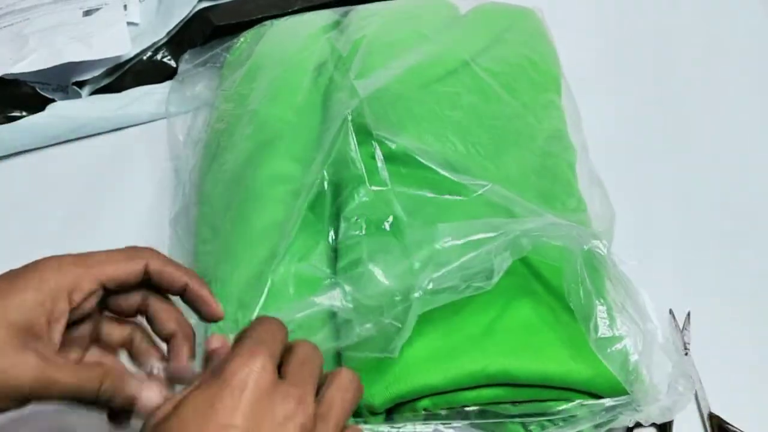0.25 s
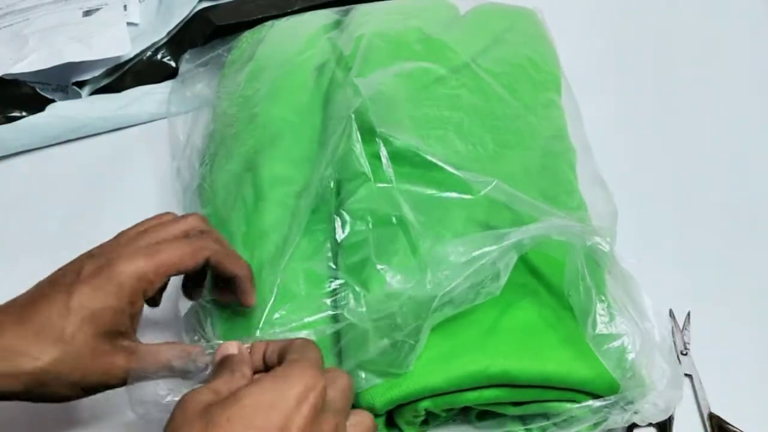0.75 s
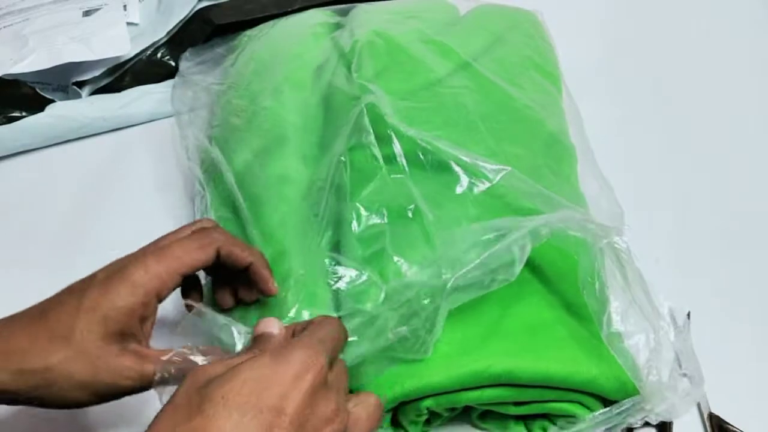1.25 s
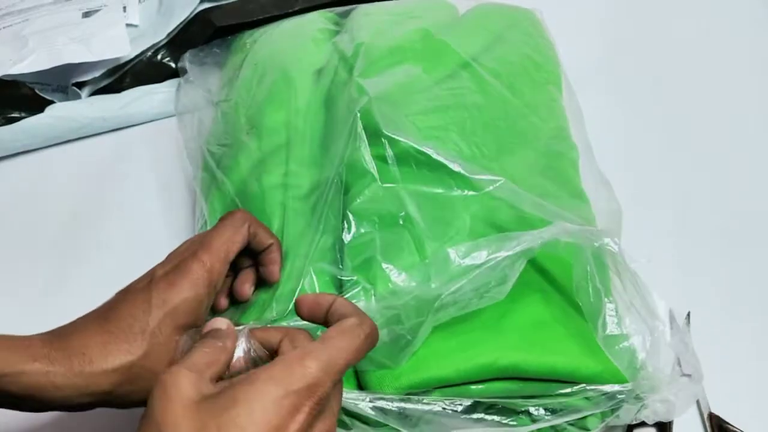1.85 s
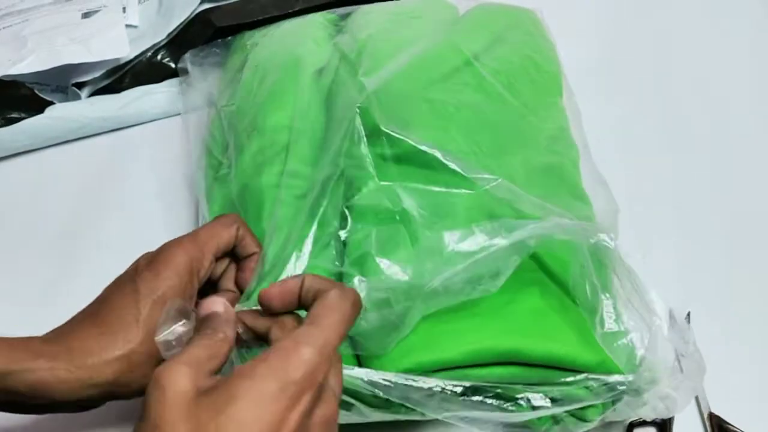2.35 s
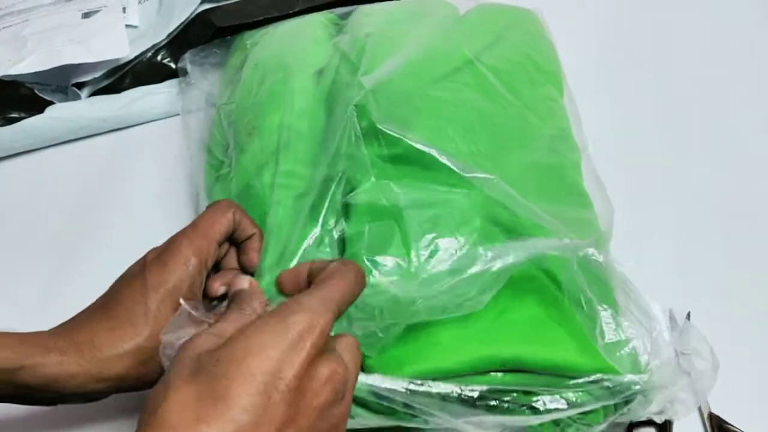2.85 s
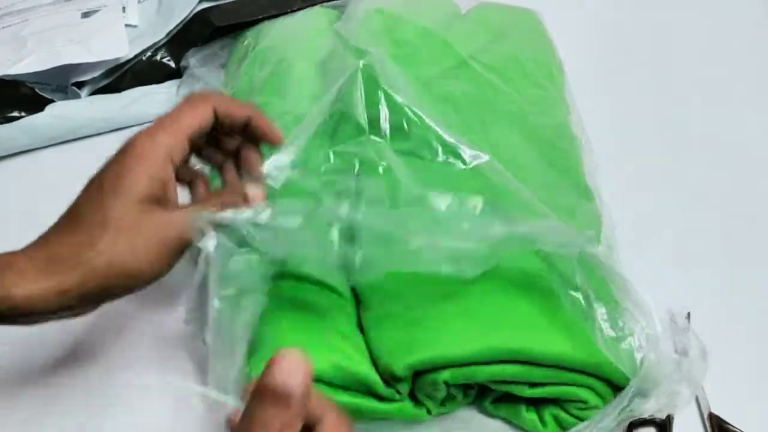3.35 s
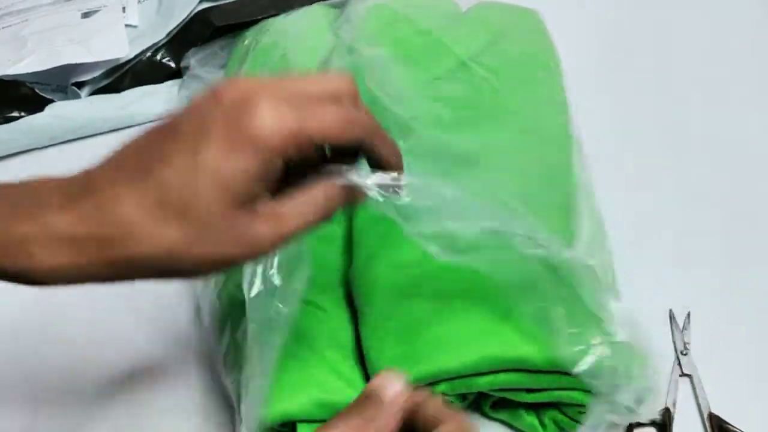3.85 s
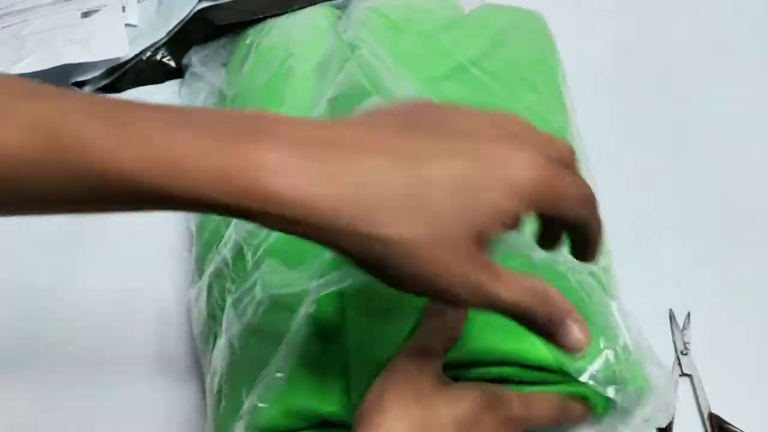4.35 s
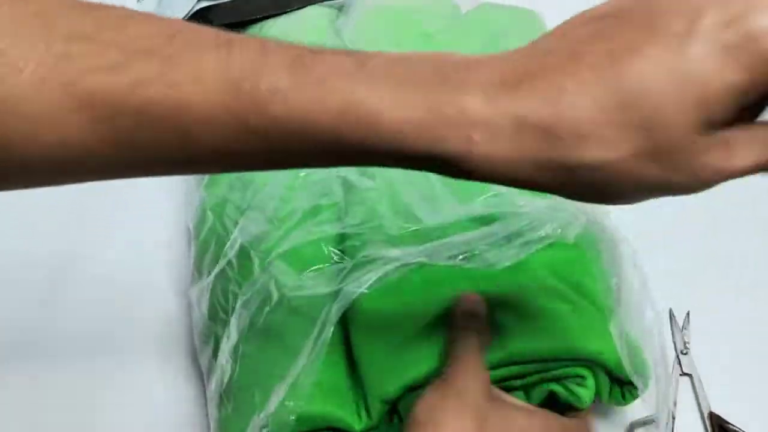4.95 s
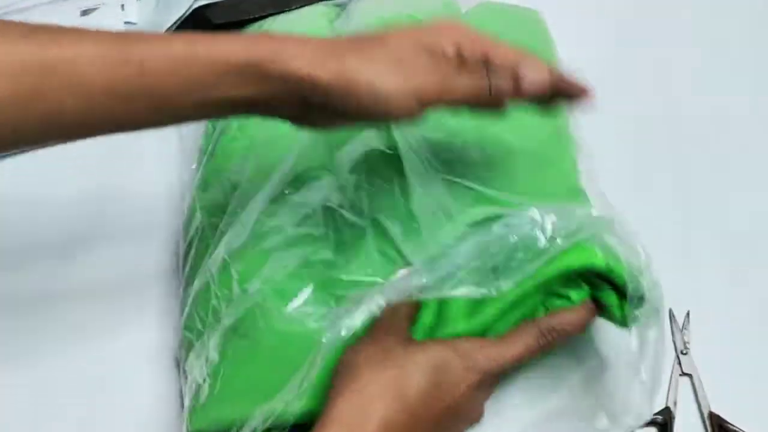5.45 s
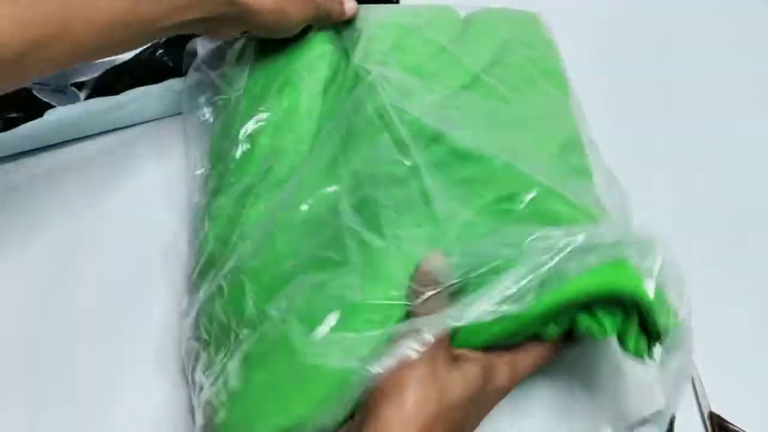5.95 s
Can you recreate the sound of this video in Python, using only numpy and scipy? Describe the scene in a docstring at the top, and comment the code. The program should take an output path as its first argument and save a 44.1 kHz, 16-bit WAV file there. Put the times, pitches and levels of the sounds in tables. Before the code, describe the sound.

A thin plastic bag crinkles, snaps and rips as hands tear it open, then rustles softly over folded cloth.

```python
"""Tearing open a polythene bag

Two hands tear a thin bag open on a table in a small room, then slide it over the folded cloth inside.
The film rustles as tiny creases buckle, and snaps and rips where pulled; the bundle bumps softly.
A close pair of microphone ports, bright near 6 and 15 kHz, hears it with reflections and a short tail."""
import sys
import numpy as np
from scipy import signal
from scipy.fft import rfft, irfft, next_fast_len
from scipy.io import wavfile

SR = 44100
rng = np.random.default_rng(int(sys.argv[2]) if len(sys.argv) > 2 else 0)


def wav_out(sig):
    """Save sig, one row per channel (or a flat mono array), as 16-bit PCM at SR to the path in sys.argv[1]."""
    wavfile.write(sys.argv[1], SR, np.round(np.clip(np.atleast_2d(sig).T, -1, 1) * 32767).astype(np.int16))


N = 272538
TIME = np.arange(N) / SR

# hands moving right to left: t/s, left port lag/samples
PORT_LAG = [(0, 6.5), (2.9, 6.5), (4.0, 4), (4.6, 0), (6.18, -4)]
# bright crack of the film: f/Hz, gain/dB
CRACK_SPECTRUM = [(1500, -31), (3000, -43), (4000, -18.5), (5500, -4.5), (6500, -2.5), (7500, -14),
                  (10500, -18.5), (13000, -17.5), (15400, -12), (16500, -31)]
# papery body of the film: f/Hz, gain/dB
BODY_SPECTRUM = [(40, -53), (120, -16), (220, 0.5), (400, -1), (850, 1.5), (1500, -0.5), (2200, 4),
                 (3100, 4.5), (4200, -6), (8000, -34.5)]


def from_db(db):
    return 10 ** (np.asarray(db) / 20)


def unit_rms(x):
    return x / np.sqrt(np.mean(x ** 2) + 1e-20)


def at_time(table, t_s):
    return np.interp(t_s, *np.transpose(table))


def at_hz(table, hz):
    f_hz, value = np.transpose(table)
    return np.interp(np.log(np.maximum(hz, 1)), np.log(f_hz), value)


def coloured(x, spectrum):
    """Minimum-phase filter, output at rms 1."""
    size = 2 * next_fast_len(x.shape[-1] // 2 + 2048)
    gain = from_db(at_hz(spectrum, np.fft.rfftfreq(size, 1 / SR)))
    cepstrum = irfft(np.log(gain))
    cepstrum[1:size // 2] *= 2
    cepstrum[size // 2 + 1:] = 0
    return unit_rms(irfft(rfft(x, size) * np.exp(rfft(cepstrum)))[..., :x.shape[-1]])


def resonance(x, hz, width_hz):
    r = np.exp(-np.pi * width_hz / SR)
    return signal.lfilter([1, 0, -1], [1, -2 * r * np.cos(2 * np.pi * hz / SR), r * r], x)


def drift(per_s):
    """Random wander, rms 1."""
    knots = rng.standard_normal(int(N / SR * per_s) + 2)
    return unit_rms(np.interp(TIME * per_s, np.arange(len(knots)), knots))


def swell(start_s, length_s):
    """Rounded envelope, 0 to 1 and back."""
    return np.sqrt(np.clip(1 - (2 * (TIME - start_s) / length_s - 1) ** 2, 0, 1))


def stereo_noise(spectrum, width):
    return coloured(rng.standard_normal(N) + width * rng.standard_normal((2, N)), spectrum)


def air(level_db=-70):
    """Quiet, dull room air."""
    # f/Hz, gain/dB
    spectrum = [(20, -20), (70, 16.5), (200, 10), (600, 10.5), (2000, -10), (6000, -18), (10000, -45)]
    return from_db(level_db) * stereo_noise(spectrum, width=0.5)


def room_decay(age_s, hz):
    """The room's ring dies sooner in the treble."""
    # f/Hz, T60/s
    reverb_times = [(150, .42), (1000, .33), (6000, .31), (15000, .26)]
    return np.exp(-np.log(1000) * age_s / at_hz(reverb_times, hz))


def room(x, tail_db=-4.2, build_ms=0.29):
    """Direct sound, reflections from nearby surfaces, standing waves and a diffuse tail."""
    # early reflections: delay/ms, level/dB
    echoes = [(2.7, -27), (4.6, -24), (9.0, -26)]
    # standing waves: f/Hz, level of the whole ring/dB
    modes = [(133, -22.5), (189, -31.5), (249, -29.5), (417, -29), (524, -30)]
    # tail, left to right: f/Hz, coherence/0-1
    coherence = [(130, .96), (300, .88), (640, .68), (1400, .25), (3000, .03)]
    size = SR // 2
    age_s, hz = np.arange(size) / SR, np.fft.rfftfreq(size, 1 / SR)
    mid, side = rfft(rng.standard_normal((2, size)))
    alike = at_hz(coherence, hz)
    diffuse = np.sqrt(1 + alike) * mid + np.sqrt(1 - alike) * side * [[1], [-1]]
    octave = np.round(np.log2(np.maximum(hz, 100)))
    tail = sum(irfft(diffuse * (octave == k), size) * room_decay(age_s, 2 ** k)
               for k in np.unique(octave))
    tail *= 1 - np.exp(-age_s * 1000 / build_ms)
    standing = sum(from_db(db) * unit_rms(np.cos(2 * np.pi * f_hz * age_s) * room_decay(age_s, f_hz))
                   for f_hz, db in modes)
    response = (from_db(tail_db) * unit_rms(tail) + standing) / np.sqrt(size)
    response[:, 0] += 1
    for delay_ms, db in echoes:
        at = int(delay_ms * SR / 1000) + rng.integers(0, 5, 2)
        response[[0, 1], at] += from_db(db)
    return signal.fftconvolve(x, response, axes=1)[:, :N]


def hand_work(attack_s=0.046, release_db_per_s=76.5, settle_db_per_s=84.5, let_go_db_per_s=250):
    """Rubbing and crackling envelopes; picking and pushes add in power."""
    # fingers pick at the film until it is open: t/s, rubbing/dB
    picks = [(0.0, -57.5), (0.78, -57), (1.3, -52), (1.42, -53.5), (1.55, -52), (2.0, -53.5), (3.15, -53),
             (3.53, -52)]
    # a hand pushes the film along: t/s, length/s, rubbing/dB, crackling re rubbing/dB
    pushes = [(0.0, 0.023, -53.5, 4.5), (0.28, 0.17, -56, -2), (1.984, 0.15, -52, 5.5),
              (2.676, 0.059, -47.5, -1), (3.584, 0.21, -51.5, 2.5), (3.821, 0.13, -43, 3),
              (4.01, 0.046, -48.5, -28), (4.376, 0.18, -54, -0.5), (4.457, 0.2, -48, 3),
              (4.61, 0.17, -47, 0.5), (5.114, 0.075, -44.5, 2), (5.298, 0.2, -52.5, -0.5),
              (5.542, 0.14, -53, -1), (5.735, 0.21, -51, -4.5), (5.993, 0.38, -48, 0.5)]
    let_go_s = np.maximum(TIME - picks[-1][0], 0)
    picking = from_db(at_time(picks, TIME) - let_go_db_per_s * let_go_s)
    rub_power, crackle_power = picking ** 2, (picking * from_db(1.5)) ** 2
    for start_s, length_s, db, crackle_rel_db in pushes:
        attack = np.clip((TIME - start_s) / attack_s, 0, 1)
        after_s = np.maximum(TIME - start_s - length_s, 0)
        rub_power += (attack * from_db(db - release_db_per_s * after_s)) ** 2
        crackle_power += (attack * from_db(db + crackle_rel_db - settle_db_per_s * after_s)) ** 2
    crackle_power += from_db(-67.5) ** 2  # resting film still crackles faintly
    return np.sqrt(rub_power), np.sqrt(crackle_power)


def bundle_shift(rubbing, rel_db=-16.5):
    """The bundle shifts with the film that rubs on it."""
    # f/Hz, gain/dB
    spectrum = [(30, -18), (52, -34), (70, -8), (95, 1), (140, 2), (230, 7), (400, -13), (1000, -32)]
    return rubbing * from_db(rel_db) * stereo_noise(spectrum, width=0.25)


def bumps(rel_width=0.85):
    """Padded bumps and drags of the hands stir a broad low resonance of the bundle."""
    # t/s, length/s, f/Hz, level/dB
    contacts = [(1.58, 0.34, 185, -58.5), (2.87, 0.3, 80, -68), (2.982, 0.043, 195, -45),
                (3.34, 0.2, 85, -64.5), (4.23, .075, 345, -59), (4.64, 0.16, 115, -67)]
    out = np.zeros(N)
    for start_s, length_s, hz, db in contacts:
        hollow = resonance(rng.standard_normal(N), hz, rel_width * hz)
        hollow = resonance(hollow, hz, rel_width * hz)
        out += from_db(db) * swell(start_s, length_s) * unit_rms(hollow)
    return out


def creases(per_s, spread_db, clump_db, clumps_per_s, scatter_samples, patches=10, ring_s=0.0003):
    """Creases buckle in clumps on patches of film, each patch with its own ring and path to the ports."""
    lag = at_time(PORT_LAG, TIME)
    chance = per_s * from_db(clump_db * drift(clumps_per_s)) / SR
    out, age_s = np.zeros((2, N)), np.arange(48) / SR
    for _ in range(patches):
        at = np.flatnonzero(rng.random(N) < chance / patches)
        height = from_db(spread_db * np.minimum(rng.exponential(1, N), 3.6)) * rng.choice([-1, 1], N)
        path = np.round(lag + scatter_samples * rng.standard_normal(N)).astype(int)
        clicks = np.zeros((2, N))
        clicks[0, np.clip(at + path[at], 0, N - 1)] = height[at]
        clicks[1, at] = height[at]
        flutter = unit_rms(rng.standard_normal(len(age_s)) * np.exp(-age_s / ring_s))
        out += signal.lfilter(flutter, [1], clicks)
    return out


def rustle(rubbing, crackling, crackle_db=-4.5, rub_db=-2, tick_db=-6.5):
    """Sharp creases crackle, film sliding on skin and cloth gives duller grains, lone creases tick."""
    # f/Hz, gain/dB
    crackle_spectrum = [(1500, -59), (3000, -16.5), (4000, -11.5), (5700, 6.5), (6500, 5.5), (7500, -2.5),
                        (10500, -12.5), (13000, -8.5), (15400, -6), (16500, -20)]
    # f/Hz, gain/dB
    rub_spectrum = [(40, -45), (160, -7), (280, 1.5), (900, 2.5), (2200, 3), (3200, -2.5), (4500, -14),
                    (9000, -38)]
    stick_slip = from_db(2.6 * drift(per_s=70))
    sharp = creases(per_s=1500, spread_db=2.5, clump_db=6, clumps_per_s=80, scatter_samples=4)
    fine = creases(per_s=6000, spread_db=3.5, clump_db=4.5, clumps_per_s=65, scatter_samples=5)
    lone = creases(per_s=70, spread_db=3.5, clump_db=1.5, clumps_per_s=26, scatter_samples=3)
    sharp, fine = unit_rms(stick_slip * sharp), unit_rms(stick_slip * fine)
    crackle = crackling * from_db(crackle_db) * coloured(sharp + 0.59 * fine, crackle_spectrum)
    rub = rubbing * from_db(rub_db) * coloured(0.57 * sharp + fine, rub_spectrum)
    ticks = crackling * from_db(tick_db) * coloured(lone, CRACK_SPECTRUM)
    return crackle + rub + ticks


def rips_and_crumple(body_db=-2.5):
    """A running tear or a brief crumple: a dense train of small snaps that swells and stops."""
    # t/s, length/s, level/dB
    bursts = [(1.702, 0.064, -41.5), (2.287, 0.068, -28.5), (2.876, 0.022, -37.5), (2.999, 0.043, -33),
              (4.444, 0.025, -47.5)]
    level = sum(from_db(db) * swell(start_s, length_s) for start_s, length_s, db in bursts)
    train = creases(per_s=3000, spread_db=2, clump_db=3, clumps_per_s=250, scatter_samples=2)
    return level * (coloured(train, CRACK_SPECTRUM) + from_db(body_db) * coloured(train, BODY_SPECTRUM))


def jerks(start_s=2.2868, gap_s=0.0062, slowing=1.13, first_db=-19.5, loss_db=2.1):
    """The long tear gives way in slowing, weakening jerks; rows for snaps()."""
    body_rel_db, ring_hz = -2.5, 1040
    times_s = start_s + gap_s * (slowing ** np.arange(8) - 1) / (slowing - 1)
    return [(t_s, first_db - loss_db * k, body_rel_db, ring_hz) for k, t_s in enumerate(times_s)]


def snaps(flutter_ms=0.4, smear_db=-12, smear_ms=4.9, ring_db=-4, gain_db=0.5):
    """Taut film lets go with a pulse and flutter, smeared by close reflections."""
    # t/s, crack level/dB, body re crack/dB, ring of the stretched film/Hz
    releases = [(0.0199, -39, -3, 510), (0.1106, -40.5, -13, 880), (0.3882, -42.5, -14, 1500),
                (0.5264, -37, -27, 1540), (0.6071, -44, -28, 630), (0.948, -38, -15, 970),
                (1.0245, -34.5, -9.5, 1710), (1.2122, -34.5, -27, 1040), (1.3476, -32.5, -17, 2390),
                (1.4788, -28, -12, 430), (1.5486, -25.5, -10, 2760), (1.5916, -23, -2.5, 1750),
                (1.677, -18.5, -6, 1740), (1.7144, -20.5, -3, 1460), (1.7288, -22.5, -4, 1000),
                (1.7534, -23.5, -1.5, 900), (1.843, -18, -6, 810), (1.8799, -19.5, -6.5, 726),
                (2.4059, -23.5, -5, 646), (2.5406, -35, -16, 770), (2.6484, -34.5, -7.5, 820),
                (2.8386, -24, -4, 3350), (2.8745, -22, -2, 800), (2.8764, -28, 5.5, 800),
                (2.8893, -18, -8.5, 1940), (2.944, -23, -4.5, 825), (2.9891, -19.5, -5.5, 494),
                (3.2026, -37, -31, 2120), (3.4066, -34.5, -13, 1290), (3.951, -36, -10, 3080),
                (4.71, -33, -10, 980), (4.7904, -33.5, -10, 1600), (5.1338, -49.5, -0.5, 1380)]
    size, level_samples = 1024, 60  # level counts a snap's energy as packed into level_samples
    out, age_ms = np.zeros((2, N + 2 * size)), np.arange(size) / SR * 1000
    decay = np.exp(-age_ms / flutter_ms) + from_db(smear_db) * np.exp(-age_ms / smear_ms)
    for t_s, db, body_rel_db, ring_hz in releases + jerks():
        pulse = decay * (rng.standard_normal(size) + rng.standard_normal((2, size)))
        pulse[:, 0] += 2.2  # sharp onset
        crack = coloured(pulse, CRACK_SPECTRUM)
        papery = coloured(pulse, BODY_SPECTRUM)
        ring = from_db(ring_db) * unit_rms(resonance(papery, ring_hz, width_hz=330))
        gain = from_db(db + gain_db) * np.sqrt(level_samples / size)
        snap = gain * (crack + from_db(body_rel_db) * (papery + ring))
        lag = int(round(at_time(PORT_LAG, t_s)))
        for side, start in enumerate([int(t_s * SR) + lag, int(t_s * SR)]):
            out[side, start:start + size] += snap[side]
    return out[:, :N]


def scene(pan_db=0.4):
    """Snaps, rips and crumple with bumps, and rustle each get their own room echo, over quiet air."""
    rubbing, crackling = hand_work()
    bundle = bundle_shift(rubbing)
    bag = room(snaps()) + room(rips_and_crumple() + bumps()) + room(rustle(rubbing, crackling))
    return air() + bundle + bag * from_db([[-pan_db], [pan_db]])


def record(dry, cutoff_hz=16100):
    """Steep low-pass."""
    return signal.sosfilt(signal.ellip(10, 0.2, 80, cutoff_hz, fs=SR, output="sos"), dry)


dry = scene()
out = record(dry)
wav_out(out)
```